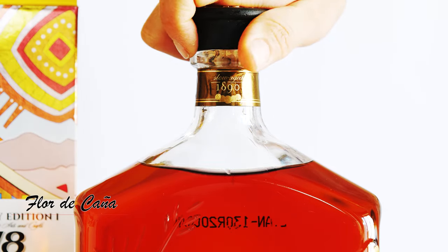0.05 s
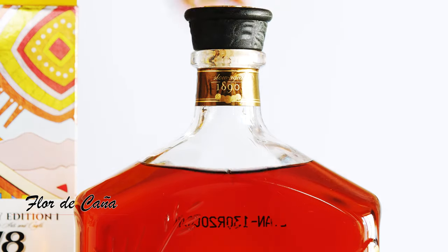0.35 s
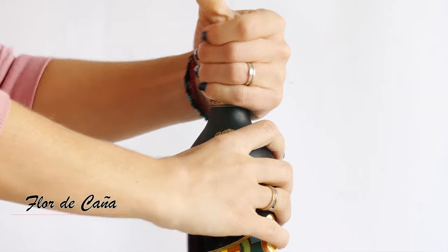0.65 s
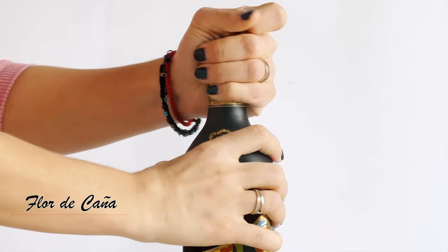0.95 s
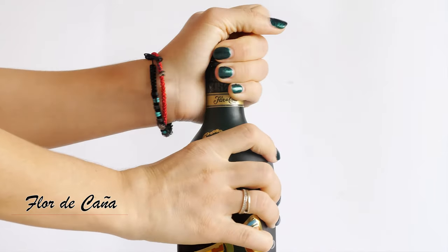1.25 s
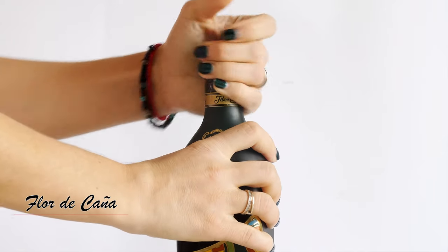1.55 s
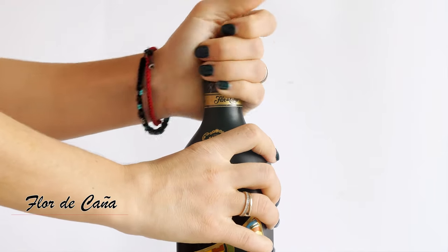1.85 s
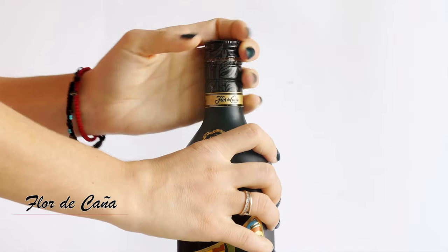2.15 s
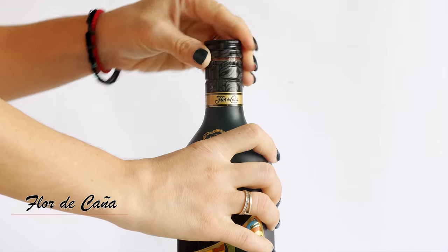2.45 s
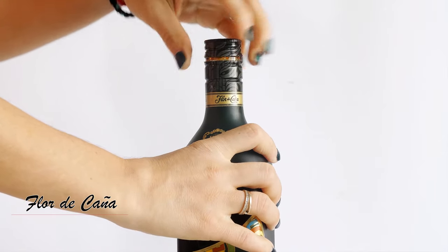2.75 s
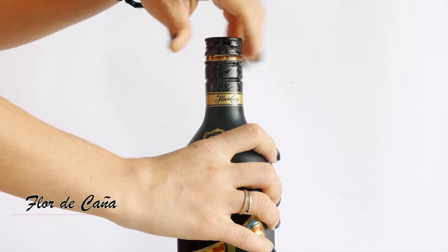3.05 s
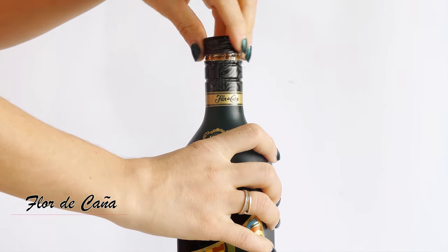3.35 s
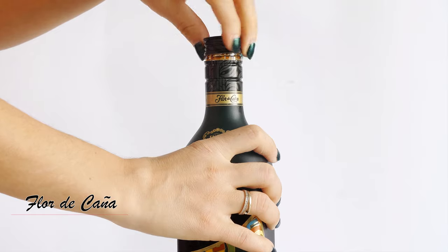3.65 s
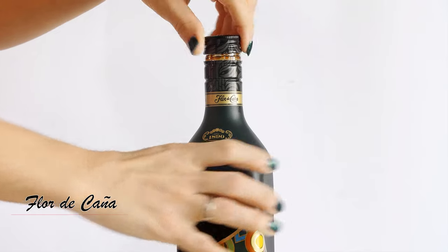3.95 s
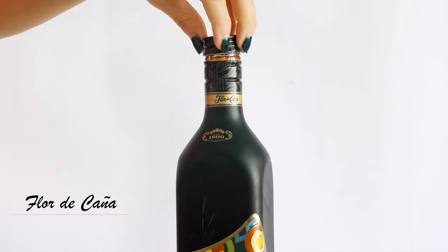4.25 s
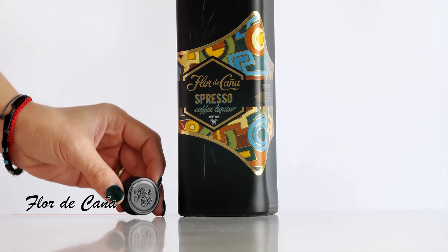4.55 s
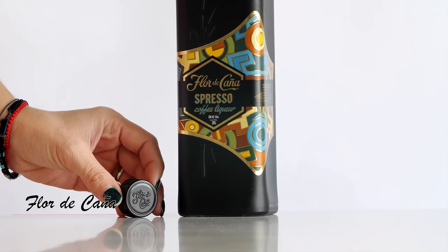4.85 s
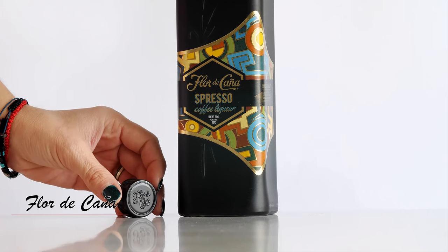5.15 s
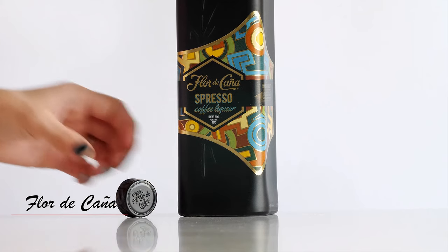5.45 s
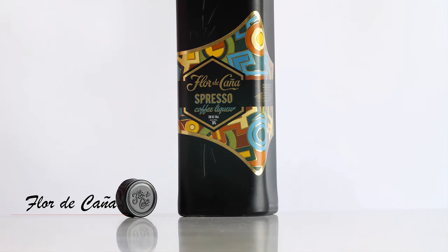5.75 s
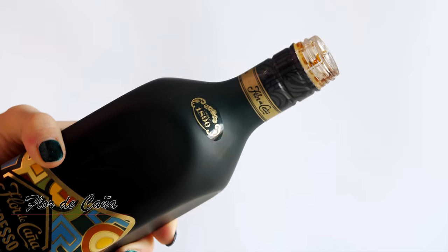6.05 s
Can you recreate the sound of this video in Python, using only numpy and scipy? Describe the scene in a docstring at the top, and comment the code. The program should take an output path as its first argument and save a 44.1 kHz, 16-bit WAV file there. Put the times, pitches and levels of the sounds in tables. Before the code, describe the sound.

Hands grip a glass bottle and twist its cap off with sharp snaps, small irregular ticks and a faint metallic rasp.

```python
"""A small, bare room, where a metal screw cap is twisted off a glass bottle, heard close up.
The bridges of the seal snap one by one and set cap and bottle ringing. The loose cap ticks and scrapes
along the glass thread while the air under it rises in pitch; this ends in a thin squeal and is cut off
dead. Then the cap is tapped down on the table. Hands knock and rub on the bottle, which gives hollow
plunks, over a bed of hiss and low murmur."""
import sys
import numpy as np
from scipy import signal
from scipy.fft import rfft, irfft, next_fast_len
from scipy.io import wavfile

SR = 44100
rng = np.random.default_rng(int(sys.argv[2]) if len(sys.argv) > 2 else 0)


def persist_wave(psi):
    """Save psi, clipped to +-1, as 16-bit WAV."""
    counts = np.round(np.clip(psi, -1, 1) * 32767).astype(np.int16)
    wavfile.write(sys.argv[1], SR, np.atleast_2d(counts).T)


N = 273949
CUT_S = 4.443  # the sound of unscrewing cuts off abruptly

# Seal bridges breaking. Each row: start in seconds, level in dB, pitch in Hz, low push in relative dB.
SEAL_SNAPS = [(1.0499, -14, 8660, -8.5), (1.0728, -20, 5500, -24), (1.0806, -9.5, 4470, -19),
              (1.1046, -11, 3460, -21.5), (1.1398, -11.5, 3600, -20.5), (1.2979, -22.5, 8800, -11),
              (1.2994, -8.5, 4070, -16)]
# The cap catching. Each row: start in seconds, level in dB, pitch in Hz, low push in relative dB.
THREAD_TICKS = [(1.5357, -39.5, 4200, -23), (2.6925, -37.5, 2870, -22), (3.091, -33, 3240, -13),
                (3.3016, -20.5, 5230, -12.5), (3.3718, -29.5, 5600, -20), (3.3862, -31.5, 2830, -13),
                (3.6995, -26.5, 6850, -17.5), (4.0752, -42.5, 3600, -23), (4.0812, -40.5, 3720, -27),
                (4.271, -33, 3500, -12), (4.2975, -39, 7600, -15)]
# Cap on table. Each row: start in seconds, level in dB, pitch in Hz, low push in relative dB.
CAP_TAPS = [(4.8368, -30, 2390, -19.5), (4.9745, -46.5, 1500, -20), (5.1635, -47, 1400, -6.5)]
# Turns of the cap. Each row: fastest moment, rise and fall in seconds, rasp and hollow note in dB.
CAP_TURNS = [(2.02, 0.091, 0.15, -53, -65), (2.2, 0.069, .04, -47.5, -59),
             (2.546, .03, 0.038, -58.5, -65.5), (2.635, 0.027, .03, -56, -66),
             (2.976, 0.025, 0.018, -53.5, -60), (3.056, 0.042, 0.043, -45, -57),
             (3.693, 0.0056, 0.016, -44.5, -36.5), (3.936, .012, 0.065, -57.5, -66),
             (4.03, .01, 0.016, -63, -56), (4.39, 0.017, 0.038, -48.5, -51), (4.44, 0.026, 0.035, -48, -45)]
# Air under the cap, rising as it unscrews. Each row: time in seconds, pitch in Hz.
CAVITY_PITCH = [(2.2, 1104), (3.7, 1387), (4.44, 1499)]
# Hands bumping cap and bottle.
# Each row: start in seconds, level in dB, pitch in Hz, softness in seconds, thud in relative dB.
HAND_KNOCKS = [(.372, -44, 500, 0.0066, 13), (.675, -36, 515, 0.0017, 7.5), (.715, -35, 1430, .0007, -2),
               (1.024, -30.5, 700, 0.0013, -4.5), (1.440, -38, 720, 0.0053, 6.5),
               (2.691, -39, 710, .003, -21), (4.278, -35.5, 378, 0.0016, -7), (5.944, -38, 910, 0.0027, -5)]
# Hollow notes of the full bottle. Each row: start in seconds, level in dB, pitch in Hz.
BOTTLE_PLUNKS = [(1.024, -33, 351), (1.31, -32.5, 341), (1.441, -28.5, 373), (1.463, -46, 434),
                 (3.580, -48, 346)]
# Palms taking hold. Each row: firmest moment, rise and fall in seconds, rub and low thud in dB.
PALM_GRIPS = [(.08, .2, 0.28, -55.5, -60), (.39, 0.13, 0.18, -51, -51), (.73, 0.069, 0.26, -45.5, -50),
              (1.68, 0.08, 0.42, -55, -59), (6.02, .07, .12, -53.5, -54)]
# Fingers sliding. Each row: fastest moment, rise and fall in seconds, level in dB, centre in Hz.
FINGER_SLIDES = [(.368, 0.009, 0.031, -56, 2020), (2.205, .025, 0.086, -50.5, 950),
                 (3.96, 0.038, .08, -53.5, 616), (4.325, .015, 0.025, -55, 594),
                 (4.68, 0.011, 0.055, -55, 322), (6.005, 0.018, 0.054, -51.5, 620),
                 (6.12, .03, 0.097, -60.5, 1090)]

# Resonances. Each row: pitch in Hz, level in dB, seconds to die away by 60 dB.
CAP_BOTTLE_MODES = [(966, -7.5, 0.44), (1998, -5.5, 0.55), (2804, 0, 0.27), (3270, -7, 0.23),
                    (3360, -6, 0.28), (3500, -9, 0.22), (3596, 3, 0.25), (3660, -2, 0.27), (4310, -30, .25),
                    (4550, -4.5, 0.18), (4960, -3.5, 0.22), (5320, -7, 0.15)]  # cap and bottle ringing together
LOOSE_CAP_MODES = [(789, 0, 0.43), (1403, 1, 0.31), (1512, 7, 0.076), (2680, -3, .25), (6370, -2, 0.16)]  # join in once the cap sits loose
CAP_TABLE_MODES = [(1046, -5, .3), (1306, 2, 0.33), (1940, 0, 0.18), (3040, 0, 0.19)]  # the cap pressed on the table top
STANDING_WAVES = [(140.7, 4, 0.44), (167, -8.5, 0.68), (259, -8, 0.41), (339, -4.5, 0.67),
                  (451.8, 2.5, 0.35), (520, -2, 0.33)]  # the boom of the room

# Noise colours. Each row: frequency in Hz, spectral level in dB.
SNAP_COLOUR = [(100, -5), (400, -2.5), (650, -13.5), (1000, -5.5), (1700, -10.5), (2400, -8.5), (3500, -1),
               (5000, -8.5), (6500, -10), (9000, -9), (11500, -21), (15500, -36)]  # the tight cap cracking
TICK_COLOUR = [(100, -5), (450, 1), (900, 0.5), (1400, -4), (2100, -4), (3200, -0.5), (4200, -6),
               (6300, -7), (9500, -7), (12000, -21), (15500, -40)]  # the loose cap catching
RASP_COLOUR = [(300, 1.5), (700, 0.5), (1400, -9), (2100, -7.5), (3300, -10), (4300, -3.5), (6500, -4.5),
               (10200, -8), (12500, -20), (15500, -34)]  # metal scraping on glass
TAP_COLOUR = [(120, -8), (500, -8), (750, -11), (1050, 5), (1350, -2), (1650, -9.5), (2000, -6),
              (2600, -14), (3200, -11.5), (4300, -12.5), (5600, -38), (11000, -45)]  # the cap meeting the table
SKIN_COLOUR = [(150, -4), (350, 2.5), (600, -2), (1150, -8.5), (1600, -14.5), (2200, -17.5), (3500, -19),
               (9000, -27)]  # palms on glass
AIR_COLOUR = [(20, -11), (38, -38), (66, 3), (100, -9.5), (160, 0), (280, -12.5), (500, -16), (850, -16),
              (1400, -22), (3000, -22.5), (8000, -22), (12000, -26.5), (13500, -28.5), (15500, -29)]  # the hiss of the room

# The room's tail. Each row: frequency in Hz, seconds to die away by 60 dB.
ROOM_DECAY = [(100, 1), (300, 0.58), (800, 0.49), (2000, 0.45), (5000, 0.4), (9000, 0.29), (14000, 0.41)]
# Reflections off the table and nearest walls. Each row: delay in seconds, level in relative dB.
EARLY_ECHOES = [(.0058, -8.5), (.0094, -14), (0.0126, -15), (0.0196, -18)]


def seal_snaps():
    """The bridges of the tight cap break, each with a sharp crack."""
    return clicks(SEAL_SNAPS, SNAP_COLOUR, CAP_BOTTLE_MODES, crack_db=-9, crack_t60=0.022,
                  ring_db=-28.5, room_db=-22.5, push_db=2.5, boom_db=-13.5)


def thread_ticks(crinkle_db=-45.5, crinkle_hz=3720, crinkle_push_db=-11):
    """The torn seal settles in faint, chance crinkles; the loose cap knocks against the glass thread."""
    crinkles = [(s, crinkle_db, crinkle_hz, crinkle_push_db) for s in rng.uniform(1.58, 1.68, size=3)]
    modes = [*CAP_BOTTLE_MODES, *LOOSE_CAP_MODES]
    return clicks([*THREAD_TICKS, *crinkles], TICK_COLOUR, modes, crack_db=-8, crack_t60=0.027,
                  ring_db=-26, room_db=-18, push_db=7, boom_db=-16)


def cap_scrape(rasp_db=-2, hollow_db=-3, room_db=-7):
    """The cap sticks and slips on the thread: a grainy metal rasp over the hollow air inside."""
    rasp, hollow = strokes(CAP_TURNS)
    shell = singing_shell()
    metal = amp(rasp_db) * rasp * (coloured(RASP_COLOUR, N) + shell)
    cavity = amp(hollow_db) * hollow * fuzzy_tone(curve(CAVITY_PITCH), width_hz=90)
    direct = (metal + cavity + rim_squeal()) * slips(depth_db=2, rate_hz=150)
    tail = reverberant(rng.standard_normal(SR), build_s=0.00079)
    return direct + amp(room_db) * signal.fftconvolve(direct, tail / np.linalg.norm(tail))[:N]


def singing_shell(damped_db=-11, free_db=1, skirt_db=-2, release_s=1.3):
    """The rubbed shell of the cap: damped by the fist at first, ringing once held by the fingertips."""
    t = seconds(N)
    short_ring = ring(CAP_BOTTLE_MODES, seconds(SR)) * fade(seconds(SR), 0.013)
    shell = unit(signal.fftconvolve(band(3700, 0.51, N), short_ring)[:N])
    skirt_hz = CAP_BOTTLE_MODES[2][0]  # rubbing favours the lowest note of the skirt
    skirt = fuzzy_tone(np.full(N, skirt_hz), width_hz=29)
    contact = np.clip((CUT_S - t) / release_s, 0, 1)  # the skirt leaves the thread as the cap rises
    shell_db = np.interp(t, [2.2, CUT_S], [damped_db, free_db])
    return amp(shell_db) * (shell + amp(skirt_db) * contact * skirt)


def rim_squeal(start_s=4.382, start_hz=9500, sag_hz_per_s=35000, level_db=-57.5):
    """The rim squeals on the glass in the last turn, sinking in pitch."""
    t = seconds(N)
    pitch_hz = start_hz - sag_hz_per_s * (np.clip(t, start_s, CUT_S) - start_s)
    return amp(level_db) * (t > start_s) * (t < CUT_S) * fuzzy_tone(pitch_hz, width_hz=380)


def table_taps():
    """The cap, damped by the fingers, meets the table and is nudged into place."""
    return clicks(CAP_TAPS, TAP_COLOUR, CAP_TABLE_MODES, crack_db=-7.5, crack_t60=0.09,
                  ring_db=-22.5, room_db=-13, push_db=-9, boom_db=-7)


def clicks(rows, colour, modes, crack_db, crack_t60, ring_db, room_db, push_db, boom_db):
    """Each click: a brief spike, a crack of thin metal, ringing, a push of air and the room's answer."""
    track, t = np.zeros(N), seconds(SR)
    spike_rise_s = 0.00016
    walls = coloured(colour, SR)  # the bottle hardly moves, so much of the echo pattern repeats
    for s, db, hz, low_db in rows:
        spike = np.sin(2 * np.pi * hz * t) * (t / spike_rise_s) * np.exp(1 - t / spike_rise_s)
        direct = spike + amp(crack_db) * coloured(colour, SR) * fade(t, crack_t60)
        body = amp(ring_db) * ring(modes, t)
        tail = amp(room_db) * reverberant(unit(walls + 0.5 * coloured(colour, SR)), build_s=0.0043)
        # the jolt of hand and bottle shoves the air and wakes the standing waves of the room
        push = amp(push_db) * np.sin(2 * np.pi * 40 * t) * fade(t, 0.044)
        boom = amp(boom_db) * ring(STANDING_WAVES, t) * attack(t, 0.017)
        add(track, s, amp(db) * (direct + body + tail + amp(low_db) * (push + boom)))
        for delay_s, echo_db in EARLY_ECHOES:
            add(track, s + delay_s, amp(db + echo_db) * direct)
    return track


def hand_knocks(octaves=0.63, hit_db=-8, room_db=-15, thud_db=-6):
    """Dull bumps over a low thud: the softer the touch, the slower it swells and the longer it lasts."""
    track, t = np.zeros(N), seconds(SR)
    for s, db, hz, soft_s, low_db in HAND_KNOCKS:
        hit = amp(hit_db) * band(hz, octaves, SR) * fade(t, t60=0.045 + 14 * soft_s)
        tail = amp(room_db) * reverberant(band(hz, octaves, SR), build_s=0.0017)
        thud = amp(thud_db + low_db) * band(156, 0.29, SR) * fade(t, t60=0.11)
        add(track, s, amp(db) * (hit + tail + thud) * attack(t, soft_s))
    return track


def bottle_plunks(room_db=-17):
    """The full bottle shifts in the grip and gives short, round notes."""
    track, t = np.zeros(N), seconds(SR)
    for s, db, hz in BOTTLE_PLUNKS:
        note = np.sin(2 * np.pi * hz * t) * fade(t, t60=0.11) * attack(t, 0.00097)
        tail = amp(room_db) * reverberant(band(hz, 0.29, SR), build_s=0.0039)
        add(track, s, amp(db) * (note + tail))
    return track


def hand_rubs(rub_db=-3, slide_octaves=0.37):
    """Palms rub and thud on the glass as they take hold; sliding fingers give a narrower sound."""
    rub, thud = strokes(PALM_GRIPS)
    palms = amp(rub_db) * rub * coloured(SKIN_COLOUR, N) + thud * band(150, 0.38, N)
    fingers = sum(amp(db) * swell(s, rise_s, fall_s) * band(hz, slide_octaves, N)
                  for s, rise_s, fall_s, db, hz in FINGER_SLIDES)
    return (palms + fingers) * slips(depth_db=1, rate_hz=32)


def room_tone(air_db=-56, settled_db=-61.5, early_boost_db=7.5, settle_s=1.23, drift_hz=1.5):
    """Steady hiss and a low murmur that starts louder, settles and drifts in level."""
    drift_db = 0.46 * noise(lambda hz: 1 / (1 + (hz / drift_hz) ** 4), N)
    murmur_db = settled_db + early_boost_db * swell(0, settle_s, settle_s) + drift_db
    return amp(air_db) * coloured(AIR_COLOUR, N) + amp(murmur_db) * band(191.7, 0.45, N)


def reverberant(x, build_s):
    """Turn steady noise into a room tail: it builds up, then each frequency dies at its own speed."""
    hz, t, spectrum = signal.stft(x, SR, nperseg=256)
    decay = fade(t, along(ROOM_DECAY, hz)[:, None])
    _, tail = signal.istft(spectrum * decay, SR, nperseg=256)
    return tail[:len(x)] * attack(seconds(len(x)), build_s)


def ring(modes, t):
    """Decaying sines, at slightly new strengths for every blow."""
    strengths = amp(2 * rng.standard_normal(len(modes)))
    return sum(gain * amp(db) * fade(t, t60) * np.sin(2 * np.pi * (hz * t + rng.random()))
               for gain, (hz, db, t60) in zip(strengths, modes))


def fuzzy_tone(pitch_hz, width_hz):
    """A rubbed resonance: narrow noise that follows a pitch curve."""
    flutter = noise(lambda hz: 1 / (1 + (hz / width_hz) ** 2), N)
    return unit(flutter * np.sin(2 * np.pi * np.cumsum(pitch_hz) / SR))


def slips(depth_db, rate_hz):
    """The uneven stick and slip of a rubbed surface, as a gain of rms 1."""
    return unit(amp(depth_db * noise(lambda hz: 1 / (1 + (hz / rate_hz) ** 2), N)))


def strokes(rows):
    """One gain curve for each dB column: every stroke swells and fades, and their powers add."""
    return np.sqrt(sum(np.outer(amp(levels), swell(s, rise_s, fall_s)) ** 2
                       for s, rise_s, fall_s, *levels in rows))


def swell(s, rise_s, fall_s):
    """A bell-shaped envelope that rises to 1 at time s and falls again."""
    t = seconds(N) - s
    return np.exp(-np.minimum((t / np.where(t < 0, rise_s, fall_s)) ** 2, 20))


def attack(t, rise_s):
    """A soft onset from 0 towards 1."""
    return 1 - np.exp(-t / rise_s)


def fade(t, t60):
    """Exponential decay, 60 dB down at t60 seconds."""
    return np.exp(-np.log(1000) * t / t60)


def noise(gain, size):
    """Noise of rms 1 shaped by a gain function of frequency."""
    m = next_fast_len(size)
    spectrum = rfft(rng.standard_normal(m)) * gain(np.fft.rfftfreq(m, 1 / SR))
    return unit(irfft(spectrum, m)[:size])


def coloured(points, size):
    """Noise with a (Hz, dB) spectrum."""
    return noise(lambda hz: amp(along(points, hz)), size)


def band(centre_hz, octaves, size):
    """Noise in one steep-sided hump, reaching `octaves` to either side of its centre."""
    return noise(lambda hz: 1 / (1 + np.abs(np.log2((hz + 1) / centre_hz) / octaves) ** 6) ** 0.5, size)


def along(points, hz):
    """(Hz, value) points read on a log axis."""
    freqs, values = np.transpose(points)
    return np.interp(np.log(hz + 1), np.log(freqs), values)


def curve(points):
    """(Seconds, value) points joined into one value per sample."""
    return np.interp(seconds(N), *np.transpose(points))


def amp(db):
    """Decibels to gain."""
    return 10 ** (np.asarray(db) / 20)


def unit(x):
    """Scale to rms 1."""
    return x / np.sqrt(np.mean(x ** 2) + 1e-20)


def seconds(size):
    """A time axis."""
    return np.arange(size) / SR


def add(track, s, x):
    """Mix x into the track from time s on."""
    part = track[round(s * SR):][:len(x)]
    part += x[:len(part)]


def scene():
    """The unscrewing is cut off dead, as by an edit; handling and room tone carry on. All in mono."""
    unscrewing = (seal_snaps() + thread_ticks() + cap_scrape()) * (seconds(N) < CUT_S)
    mono = unscrewing + table_taps() + hand_knocks() + bottle_plunks() + hand_rubs() + room_tone()
    return np.array([mono, mono])


def record(dry, top_hz=15900):
    """A brick-wall low-pass takes off the very top."""
    m = next_fast_len(N + SR // 2)
    return irfft(rfft(dry, m) * (np.fft.rfftfreq(m, 1 / SR) < top_hz), m)[:, :N]


dry = scene()
out = record(dry)
persist_wave(out)
```